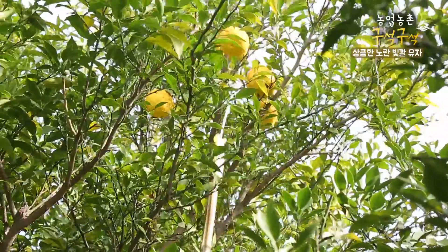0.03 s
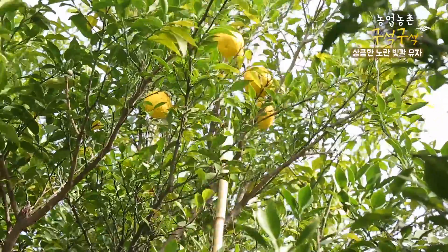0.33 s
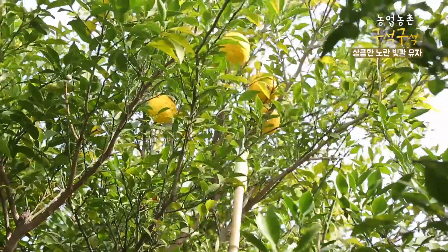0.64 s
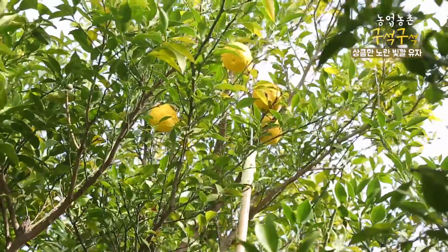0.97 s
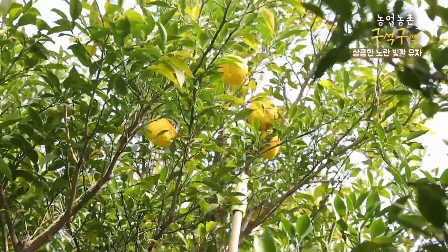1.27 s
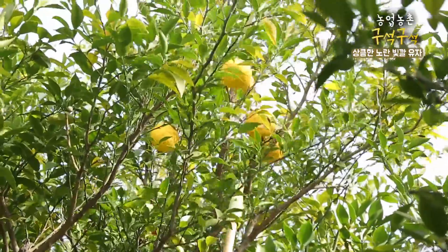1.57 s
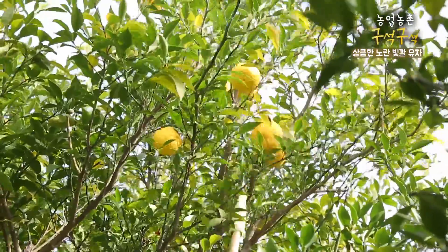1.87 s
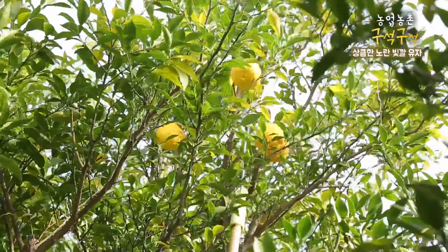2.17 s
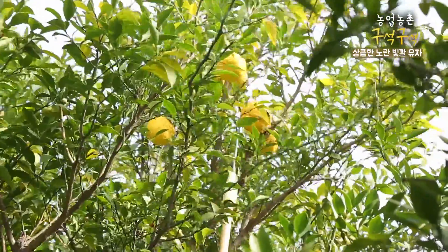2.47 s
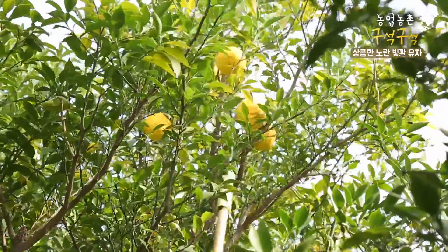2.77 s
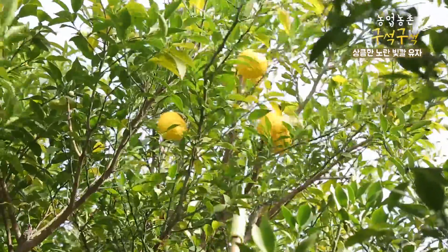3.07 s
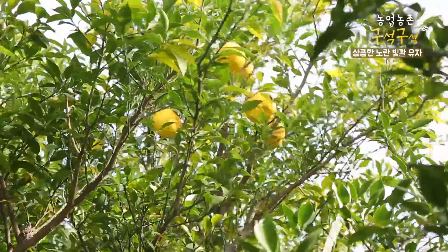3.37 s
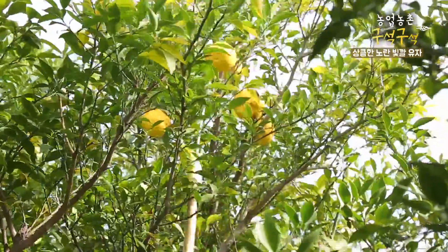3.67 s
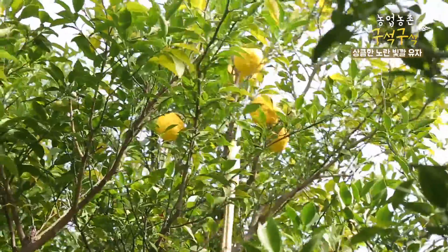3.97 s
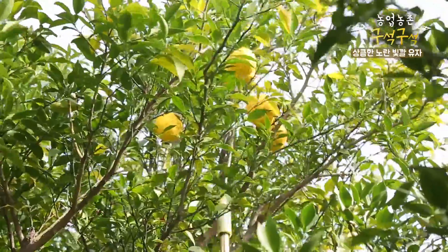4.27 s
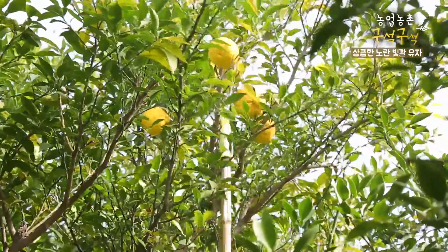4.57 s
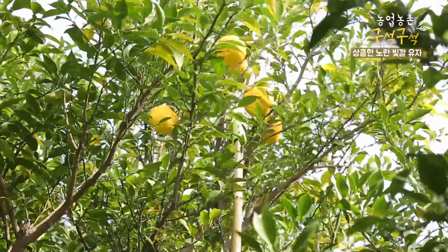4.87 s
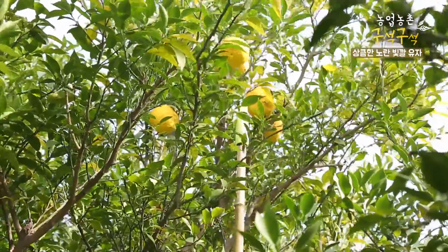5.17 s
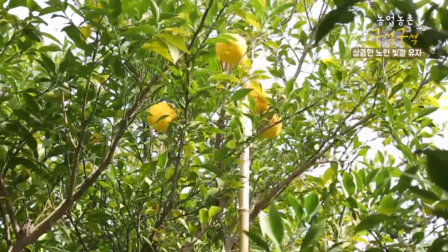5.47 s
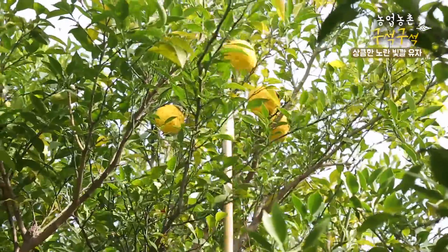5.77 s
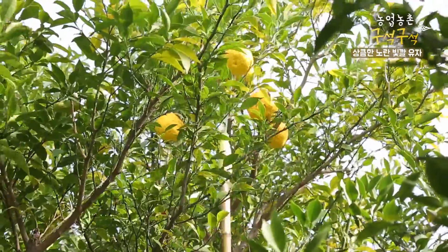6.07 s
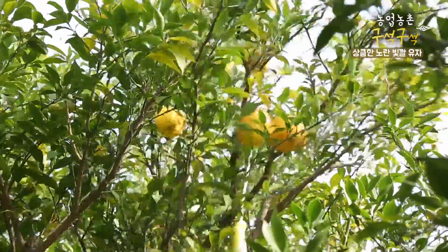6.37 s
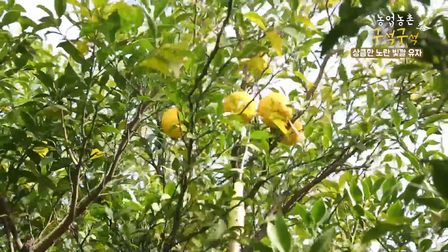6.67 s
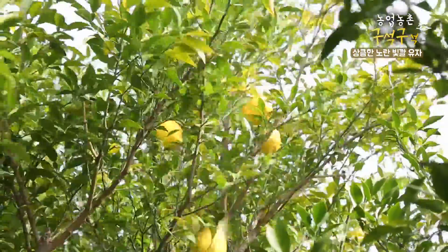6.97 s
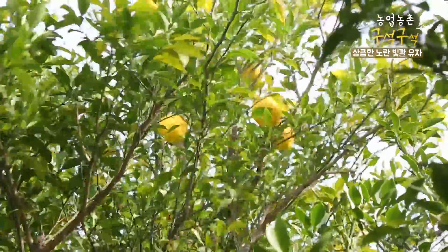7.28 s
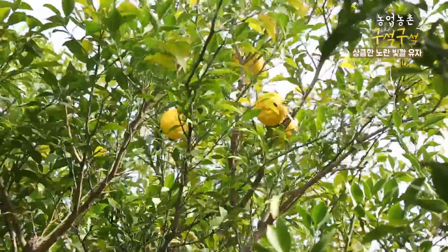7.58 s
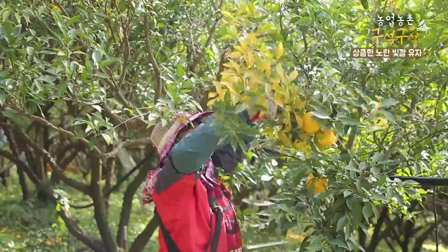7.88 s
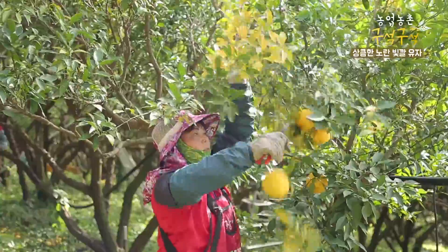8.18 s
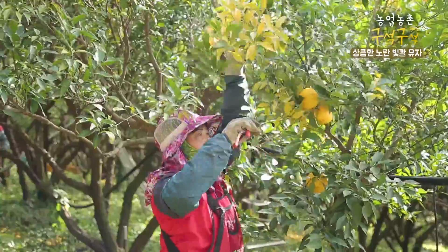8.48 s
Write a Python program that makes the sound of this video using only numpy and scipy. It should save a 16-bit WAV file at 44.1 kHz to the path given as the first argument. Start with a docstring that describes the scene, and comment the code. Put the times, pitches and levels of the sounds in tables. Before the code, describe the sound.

A bamboo pole works through a fruit tree over soft outdoor hiss and a faint, wavering engine hum, with almost no echo. For the first 1.5 seconds, leaves brush lightly and thin twigs tick. From about 1.6 to 4 seconds come busier clusters of woody knocks, snaps and swishes, with pushed limbs shuddering low and a sharp crack at 3.4 seconds. Quieter rustling and flicks follow until about 6.3 seconds. Then the leaves swish hard, and a fruit tears off with the loudest crack at 7.1 seconds, followed by another knock and a dull thump at 7.3. Around 7.9 seconds there is a second low thud, and the far engine swells into a low throb. A stem is cut with one sharp, close snap just after 8 seconds. Leaves rustle lightly, and a small bird gives one short, thin, rising whistle at about 8.4 seconds.

```python
"""A bamboo pole is worked through a citrus tree, over outdoor hiss and the hum of a far engine.
From the start, friction rustles the leaves, twigs flick and snap, and pushed limbs shudder low.
Impacts ring the branches at their own notes; late on, a fruit is torn off and thumps down.
Near 8 s the engine's slow throb swells and a stem is cut with one sharp snap close by.
Last, a small bird gives one rising whistle."""
import sys
import numpy as np
from scipy import signal
from scipy.fft import rfft, irfft
from scipy.io import wavfile
from scipy.ndimage import uniform_filter1d

SR = 44100
rng = np.random.default_rng(int(sys.argv[2]) if len(sys.argv) > 2 else 0)


def inscribe(sig):
    """Save sig as 16-bit PCM at rate SR to the path in sys.argv[1].

    A 1-D sig is mono; a 2-D sig holds one channel per row.
    Samples are clipped to [-1, 1] before scaling.
    """
    pcm = np.round(np.clip(np.atleast_2d(sig).T, -1, 1) * 32767)
    wavfile.write(sys.argv[1], SR, pcm.astype(np.int16))


N = 375732
TIME = np.arange(N) / SR
LEVEL_SPAN_S = .03  # a transient's level is its rms over this span

# knocks and snaps: start_s, level_db, pitch_hz, splinter_treble_db, hardness (contact's energy share)
IMPACTS = [(0.5146, -42.5, 3430, -11, 0.33), (1.6275, -43.5, 2480, -9.5, .3),
           (1.6762, -41.5, 2930, 0.5, 0.18), (1.823, -35.5, 730, -12.5, 0), (2.1041, -41, 2000, -7.5, 0.23),
           (2.1437, -40, 1980, -15, 0.43), (2.2813, -31.5, 3300, -6.5, 0.38), (2.7457, -31, 450, -7, 0.17),
           (2.892, -35.5, 610, -12, 0.33), (2.9277, -40.5, 614, -11, 0.46), (2.987, -42, 1550, 2, 0.76),
           (3.046, -43.5, 3220, -15, 0.56), (3.236, -39, 2987, -8.5, 0.27), (3.2678, -44, 1070, -2, 0.62),
           (3.3378, -37, 2480, -2, 0), (3.3708, -25, 2670, -10, 0.87), (3.397, -39, 2300, -6, 0.85),
           (3.7617, -40, 700, -11.5, 0.32), (3.8483, -35.5, 1310, -13, 0.27),
           (4.472, -51, 5000, 11.5, 0.73), (6.329, -35.5, 4180, -4, 0.73), (6.4768, -32.5, 1510, -21, 0.63),
           (6.9049, -40.5, 1280, 2.5, 0.53), (7.037, -43.5, 586, -7, 0.33), (7.0606, -38, 3000, 4.5, 0.04),
           (7.1043, -19.5, 1700, -11, 0.49), (7.262, -43.5, 555, -3, 0.52), (7.2866, -26, 1520, -6.5, 0.34),
           (7.316, -45, 400, -10, 0.23), (7.5165, -44.5, 3120, -4, 0.24), (7.8736, -45, 955, -40, 0.1),
           (7.9028, -35, 2110, -5, 0.18), (8.0446, -21.5, 2420, -3.5, .84)]
# resonances of pole and branches: centre_hz, width_hz, boost_db
WOOD_MODES = [(345, 160, 2.5), (503, 110, 6), (1148, 59, 6.5), (1795, 79, 3.5), (3480, 29, 7),
              (3850, 50, 3), (7150, 1400, 2)]
# spectral envelope of struck wood: frequency_hz, gain_db
KNOCK_SPECTRUM = [(40, -48), (150, -9.5), (350, -2.5), (650, -1.5), (1100, 2.5), (2000, 0.5), (4000, -3),
                  (7000, -8), (12000, -8), (16000, -18)]
# low, middle and high bands of a knock or swish: low_hz, high_hz
BAND_EDGES = [(250, 1200), (1200, 4500), (4500, 16000)]
# strokes through foliage: peak_s, level_db, t60_s, tilt_db (bark below 0, leaves above)
STROKES = [(.015, -43, 0.32, -5.5), (0.399, -48.5, .12, -0.5), (.54, -49, .45, -1.5),
           (1.531, -49, 0.14, -2), (1.69, -46, 0.13, -5), (1.85, -52.5, .3, -17), (2.0, -40.5, 0.16, -3.5),
           (2.131, -48.5, 0.49, -9), (2.534, -40.5, 0.26, -2.5), (2.791, -39, 1, -5.5),
           (2.885, -37.5, 0.14, -5.5), (3.11, -49, .25, -3), (3.29, -48.5, .45, 5.5), (3.56, -50, 0.16, 3),
           (4.27, -49.5, .25, 0.5), (4.84, -51.5, 0.12, 2.5), (5.305, -47, 0.49, -2.5),
           (5.51, -53.5, .35, -6), (5.73, -50, 0.22, 0), (6.497, -32.5, 0.6, 4.5), (6.715, -42.5, 0.36, 6),
           (6.903, -42, .06, 3), (6.95, -44, 0.42, 4.5), (7.091, -37, 0.42, 6), (7.126, -27.5, 0.074, 3.5),
           (7.314, -41.5, 0.68, 6), (8.1, -45.5, 0.69, 2.5), (8.316, -48.5, 0.6, 3)]
# spectral envelope of dragged leaves: frequency_hz, gain_db
LEAF_SPECTRUM = [(40, -48), (130, 4), (260, 2), (700, 2.5), (2200, 0), (4500, -0.5), (8000, 1.5),
                 (12500, -0.5), (16000, -9)]
# shaken limbs and heavy falls: start_s, level_db, pitch_hz, judder_s
LIMB_PUSHES = [(0., -41.5, 124, 0.09), (1.686, -41, 91, 0.043), (1.825, -39, 106, 0.061),
               (2.118, -38.5, 111, 0.049), (2.29, -40, 105.7, 0.031), (2.531, -46, 138, .057),
               (2.752, -33.5, 133, 0.097), (2.85, -34, 134, 0.12), (3.765, -39, 112, 0.0074),
               (3.851, -39, 87.5, 0.0018), (5.291, -45, 122, 0.047), (5.752, -48, 91.6, 0.014),
               (6.477, -42, 137, .008), (7.29, -30, 99.4, 0.043), (7.322, -32.5, 89.5, 0.0038),
               (7.415, -38, 100.4, 0.01), (7.904, -29, 132, 0.0037)]
# thin twigs flicking off the pole: start_s, level_db, pitch_hz
TWIG_FLICKS = [(0.242, -58, 2070), (.428, -53, 2310), (.471, -49, 2110), (.562, -49, 1200),
               (.583, -49.5, 2870), (.633, -49.5, 2140), (.819, -48.5, 3100), (0.896, -55, 2400),
               (.954, -50.5, 2040), (1.147, -54.5, 1440), (1.175, -54, 1200), (1.198, -53, 1830),
               (1.248, -50, 1040), (1.32, -53.5, 2140), (1.359, -55, 2200), (1.496, -48, 2980),
               (1.971, -46, 3550), (2.367, -42, 2250), (2.494, -45, 2420), (2.86, -39, 2150),
               (3.076, -45, 1960), (3.104, -56, 4500), (3.118, -44, 2040), (3.29, -54, 3500),
               (3.433, -48, 7460), (3.643, -57, 2560), (3.694, -48, 15170), (3.956, -55.5, 1000),
               (4.377, -45, 1660), (4.423, -52.5, 2290), (4.739, -54.5, 1710), (4.828, -55, 3240),
               (5.492, -49, 2380), (5.717, -48.5, 1600), (5.867, -57, 4890), (5.926, -49, 1310),
               (6.25, -58, 4200), (6.369, -54, 2390), (6.383, -48, 11700)]
# how strongly the crown is stirred: time_s, level_db
CROWN_MOTION = [(0.0, -55), (1.39, -51.5), (2.15, -41), (2.6, -48.5), (2.89, -55.5), (3.5, -43.5),
                (3.95, -50), (4.28, -46.5), (4.88, -56), (5.49, -50), (5.99, -56), (6.34, -47.5),
                (6.56, -43), (7.27, -49.5), (7.72, -53), (8.29, -50), (8.5, -55.5)]
# the bird's whistle: time_s, pitch_hz, level_db
WHISTLE = [(8.4, 3450, -66), (8.42, 4100, -46), (8.45, 4800, -53.5), (8.48, 5250, -63.5),
           (8.5, 5380, -56.5), (8.512, 5200, -74)]
# envelope of the engine's throb: time_s, level_db
THROB_LEVELS = [(0, -63.5), (7.88, -77), (7.93, -48), (8.52, -49.5)]
# exhaust resonances: pitch_hz, t60_s, gain_db
EXHAUST_MODES = [(106, 0.052, 0.5), (183, 0.038, -1)]
# spectral envelope of the outdoor hush: frequency_hz, gain_db
AIR_SPECTRUM = [(12, -46), (20, -6.5), (123, 3), (399, -7), (574, -9), (759, -11), (2080, -20),
                (4540, -19.5), (11800, -18), (14700, -20), (16000, -21)]


def knocks(contact_s=.0022, lag_s=.00353, clatter_rise_s=.0034, clatter_t60_s=.11, body_db_per_octave=5.5):
    """Impact excitation: a contact, then a clatter of bark and twigs, rings the modes of a branch."""
    out, t = np.zeros(N), np.arange(SR // 4) / SR
    for start_s, db, hz, splinter_db, hardness in IMPACTS:
        share = np.clip(hardness, .02, .95)
        shorten = np.exp(-1.301 * share)  # a harder blow shortens all four time constants
        grit = unit(rng.standard_normal(len(t)) * np.exp(-t / (shorten * contact_s)))
        contact = unit(bending_pulse(shorten * lag_s, len(t)) + .99 * grit)
        rise = 1 - np.exp(-t / (shorten * clatter_rise_s))
        fade = gain_of(-60 * t / (shorten * clatter_t60_s))
        clatter = unit(crackle(len(t), per_s=2500, spread_db=1.2, smooth=.91) * rise * fade)
        force = np.sqrt(share) * contact + np.sqrt(1 - share) * clatter
        modes = [*WOOD_MODES, (hz, .33 * hz, 8)]
        body_db = body_db_per_octave * np.log2(760 / hz)  # thick branches: low note, much body
        levels_db = [db + body_db, db, db + splinter_db]
        add(out, start_s, radiate(force, KNOCK_SPECTRUM, modes, levels_db, LEVEL_SPAN_S, size=16384))
    return out


def bending_pulse(lag_s, size, corner_hz=1500):
    """Dispersion: bending waves in a branch bring a click's treble first and its bass later."""
    hz = np.fft.rfftfreq(size, 1 / SR)
    delay_s = lag_s / np.sqrt(1 + hz / corner_hz)
    phase = -2 * np.pi * np.cumsum(delay_s) * SR / size
    return unit(irfft(np.exp(1j * phase), size) * (np.arange(size) < size // 2))


def swishes():
    """Stick-slip friction: the pole drags a spray of leaves in small jerks and lets it swing back."""
    out, t = np.zeros(N), np.arange(SR // 2) / SR
    modes = [(hz, width, .29 * db) for hz, width, db in WOOD_MODES]
    for peak_s, db, t60_s, tilt_db in STROKES:
        rise_s = .04 * np.sqrt(t60_s / .35)  # a longer swing gathers speed more slowly
        swell = np.minimum(t / rise_s, 1) * gain_of(-60 * np.maximum(t - rise_s, 0) / t60_s)
        jerks = gain_of(2.2 * drift(70, len(t)))
        force = swell * jerks * crackle(len(t), per_s=1500, spread_db=3.4, smooth=1.63)
        levels_db = [db - 2 - tilt_db, db, db - 2 + tilt_db]
        span_s = np.sum(swell ** 2) / SR
        add(out, peak_s - rise_s, radiate(force, LEAF_SPECTRUM, modes, levels_db, span_s, size=32768))
    return out


def thuds(overtone_ratio=1.7, overtone_db=-8):
    """Forced vibration: a juddering push rings a limb low; a long one also sounds the hollow pole."""
    out, t = np.zeros(N), np.arange(SR // 2) / SR
    hollow = unit(np.exp(-t / .002) * np.sin(2 * np.pi * 400 * t))
    for start_s, db, hz, judder_s in LIMB_PUSHES:
        t60_s = .25 * (100 / hz) ** 5.2  # heavier limbs ring lower and longer
        phase = 2 * np.pi * hz * t
        limb = np.sin(phase) + gain_of(overtone_db) * np.sin(overtone_ratio * phase)
        response = unit(limb * gain_of(-60 * t / t60_s)) + judder_s / (judder_s + .03) * hollow
        push = unit(rng.standard_normal(len(t)) / (1 + (t / judder_s) ** 6))
        push[0] += .56 * np.sqrt(.01 / judder_s)  # the first shove
        band = signal.butter(4, [.7 * hz, 620], "band", fs=SR, output="sos")
        thud = signal.sosfilt(band, signal.fftconvolve(push, response)[:len(t)])
        peak_rms = np.sqrt(uniform_filter1d(thud ** 2, round(LEVEL_SPAN_S * SR)).max())
        add(out, start_s, gain_of(db) * thud / peak_rms)
    return out


def twig_flick(pitch_hz, click_s=.002, chatter_t60_s=.06, skirt_db_per_octave=7):
    """Resonance: a scratchy click and a short chatter excite two modes of a twig."""
    t, hz = np.arange(4096) / SR, np.fft.rfftfreq(4096, 1 / SR)
    force = rng.standard_normal(len(t)) * (np.exp(-t / click_s) + .25 * gain_of(-60 * t / chatter_t60_s))
    modes = [(pitch_hz, pitch_hz / 7, 5), (1.55 * pitch_hz, pitch_hz / 6, 4)]
    skirt_db = -skirt_db_per_octave * abs(np.log2((hz + 1) / pitch_hz))
    shape = gain_of(skirt_db + resonance_db(hz, modes))
    return unit(irfft(rfft(force) * minimum_phase(shape)))


def twigs(stray_per_s=12, stray_db=-10, spread_db=7):
    """Superposed transients: distinct flicks, and faint random ones as loud as the crown's motion allows."""
    out = np.zeros(N)
    for start_s, db, hz in TWIG_FLICKS:
        add(out, start_s, gain_of(db) * twig_flick(hz))
    for when, strength, pitch in rng.random((int(stray_per_s * N / SR), 3)):
        start_s = when * N / SR
        gain = envelope(CROWN_MOTION, start_s) * gain_of(stray_db + spread_db * strength)
        add(out, start_s, gain * twig_flick(1400 * 6 ** pitch))
    return np.sqrt(LEVEL_SPAN_S * SR) * out


def rustle(branch_db=-14, twig_db=-7, leaf_db=-10):
    """Friction noise: branches rub, twigs scratch and leaves crinkle in clumps as the crown moves."""
    sway = drift(12, N)
    out = gain_of(branch_db + 3.5 * sway) * rubbing(266, 1060, per_s=900, spread_db=2, smooth=.44)
    # twigs and leaves of different sizes catch and let go each in their own time
    for db, edges_hz in (twig_db, [1100, 1900, 2800, 4300]), (leaf_db, [4300, 6800, 10000, 15000]):
        for low_hz, high_hz in zip(edges_hz, edges_hz[1:]):
            clumps = gain_of(db + 1.57 * sway + 3.17 * drift(22, N)) / np.sqrt(3)
            out += clumps * rubbing(low_hz, high_hz, per_s=600, spread_db=2.7, smooth=1)
    return envelope(CROWN_MOTION, TIME) * out


def bird():
    """Frequency modulation: one thin tone glides upward with a slight random flutter."""
    times_s, hz, db = np.transpose(WHISTLE)
    t = np.arange(times_s[0], times_s[-1], 1 / SR)
    pitch_hz = np.interp(t, times_s, hz) * (1 + .015 * drift(250, len(t)))
    tone = np.sin(2 * np.pi * np.cumsum(pitch_hz) / SR)
    out = np.zeros(N)
    add(out, times_s[0], gain_of(np.interp(t, times_s, db)) * tone)
    return out


def engine(firing_hz=21.7, hum_db=-63):
    """Periodic excitation: firings ring a far exhaust; their sixth harmonic carries as a wavering hum."""
    cycles, t = firing_hz * (TIME - .007) + 1, np.arange(SR // 8) / SR
    firings = np.diff(np.floor(cycles), prepend=0) * gain_of(1.2 * drift(10, N))
    pipe = sum(gain_of(db - 60 * t / t60) * np.sin(2 * np.pi * hz * t) for hz, t60, db in EXHAUST_MODES)
    pipe *= 1 - np.exp(-t / .016)
    throb = unit_rms(signal.oaconvolve(firings, pipe)[:N]) * envelope(THROB_LEVELS, TIME)
    hum_phase = 2 * np.pi * 6 * cycles + 1.9 * drift(4.1, N)
    hum = unit_rms(np.sin(hum_phase) * gain_of(3.7 * drift(2.1, N)))
    return throb + gain_of(hum_db) * hum


def air(level_db=-53):
    """Stationary coloured noise: the outdoor hush and hiss."""
    shape = gain_of(spectrum_db(AIR_SPECTRUM, np.fft.rfftfreq(N, 1 / SR)))
    return gain_of(level_db) * unit_rms(irfft(rfft(rng.standard_normal(N)) * shape, N))


def orchard(x, t60_s=.25, echo_db=-18, echoes_per_s=2000):
    """Scattering: trunks and foliage add a faint, dull tail."""
    t = np.arange(SR // 2) / SR
    echoes = rng.standard_normal(len(t)) * (rng.random(len(t)) < echoes_per_s / SR)
    echoes *= gain_of(-60 * t / t60_s) * (t > .008)
    tail = signal.sosfilt(signal.butter(1, 5000, fs=SR, output="sos"), unit(echoes))
    return x + gain_of(echo_db) * signal.oaconvolve(x, tail)[:N]


def crackle(size, per_s, spread_db, smooth):
    """Shot noise: tiny slips of unequal size over smooth rubbing."""
    slips = (rng.random(size) < per_s / SR) * gain_of(spread_db * np.minimum(rng.exponential(1, size), 4))
    return unit_rms(unit_rms(slips * rng.standard_normal(size)) + smooth * rng.standard_normal(size))


def rubbing(low_hz, high_hz, per_s, spread_db, smooth):
    """Band-limited shot noise."""
    band = signal.butter(2, [low_hz, high_hz], "band", fs=SR, output="sos")
    return unit_rms(signal.sosfilt(band, crackle(N, per_s, spread_db, smooth)))


def radiate(force, colour, modes, levels_db, span_s, size):
    """Source and filter: colours a force and brings each band near its rms level over span_s."""
    hz = np.fft.rfftfreq(size, 1 / SR)
    source = rfft(force, size)
    shape = gain_of(spectrum_db(colour, hz) + resonance_db(hz, modes))
    centres_hz = np.sqrt(np.prod(BAND_EDGES, axis=1))
    for _ in range(3):
        power = 2 * abs(source * shape) ** 2 / (size * span_s * SR)
        band_db = [10 * np.log10(power[(hz > lo) & (hz < hi)].sum() + 1e-20) for lo, hi in BAND_EDGES]
        shape *= gain_of(spectrum_db(np.c_[centres_hz, np.subtract(levels_db, band_db)], hz))
    return irfft(source * minimum_phase(shape), size)


def resonance_db(hz, modes):
    """Resonance peaks in dB: at each frequency the strongest mode leads."""
    return np.max([db / (1 + (2 * (hz - centre) / width) ** 2) for centre, width, db in modes], axis=0)


def minimum_phase(gain):
    """Causality: a response of this magnitude that rings after a click, never before."""
    log_gain = np.log(np.maximum(gain / gain.max(), 1e-5))
    phase = -signal.hilbert(np.r_[log_gain, log_gain[-2:0:-1]]).imag[:len(gain)]
    return gain * np.exp(1j * phase)


def drift(rate_hz, size):
    """Low-pass noise: a random wander of rms one."""
    hz = np.fft.rfftfreq(size, 1 / SR)
    return unit_rms(irfft(rfft(rng.standard_normal(size)) / (1 + (hz / rate_hz) ** 4), size))


def spectrum_db(points, hz):
    """Interpolation on a log-frequency axis."""
    points_hz, db = np.transpose(points)
    return np.interp(np.log(hz + 1), np.log(points_hz + 1), db)


def envelope(points, time_s):
    """Amplitude along a level curve in dB."""
    return gain_of(np.interp(time_s, *np.transpose(points)))


def gain_of(db):
    """Decibels to amplitude."""
    return 10 ** (np.asarray(db) / 20)


def unit_rms(x):
    """Normalises to an rms of one."""
    return x / np.sqrt(np.mean(x ** 2) + 1e-20)


def unit(x):
    """Normalises to an energy of one."""
    return x / np.sqrt(np.sum(x ** 2) + 1e-20)


def add(mix, start_s, sound):
    """Superposes a sound on the mix."""
    start = round(start_s * SR)
    sound = sound[max(-start, 0):]
    part = mix[max(start, 0):][:len(sound)]
    part += sound[:len(part)]


def scene():
    """Superposition: the tree in front, air and engine behind."""
    events = knocks() + twigs() + swishes() + thuds() + bird()
    return (orchard(events) + rustle() + air() + engine())[None]


def record(dry, cutoff_hz=15950):
    """Clipping at full scale, then band limiting."""
    lowpass = signal.firwin(511, cutoff_hz, window=("kaiser", 9), fs=SR)
    return signal.oaconvolve(np.clip(dry, -1, 1), lowpass[None], "same")


dry = scene()
out = record(dry)
inscribe(out)
```